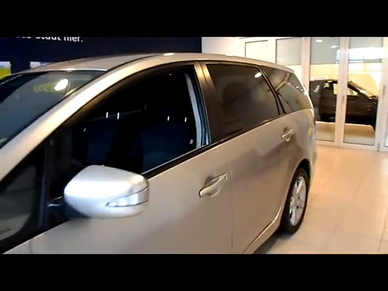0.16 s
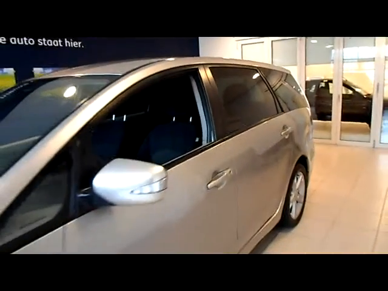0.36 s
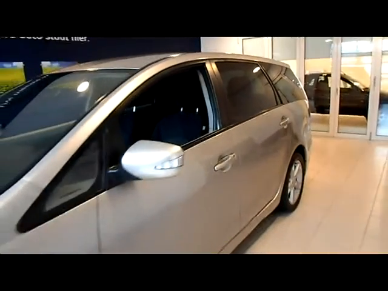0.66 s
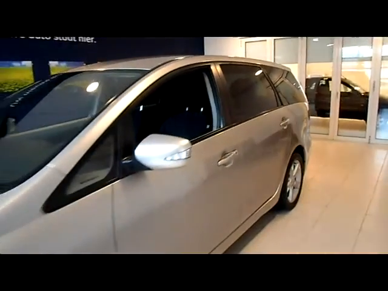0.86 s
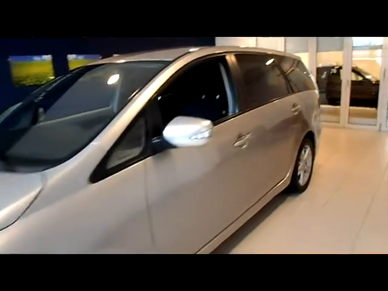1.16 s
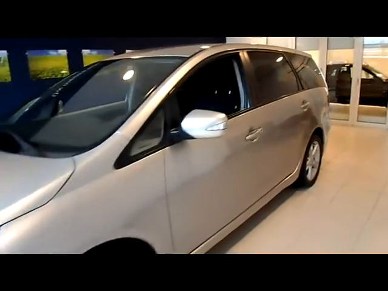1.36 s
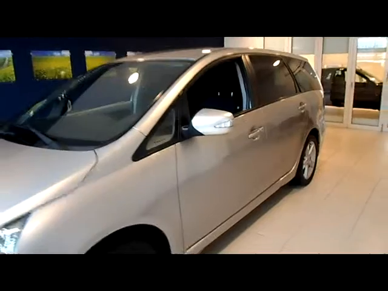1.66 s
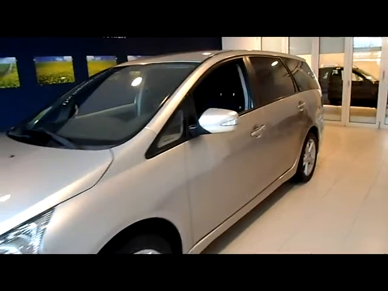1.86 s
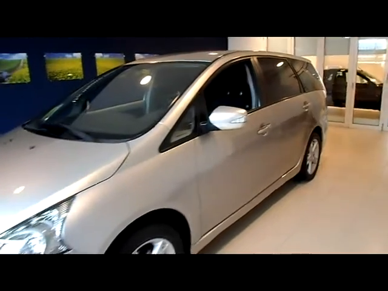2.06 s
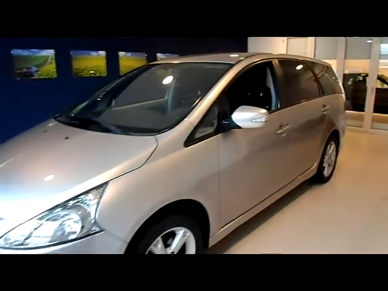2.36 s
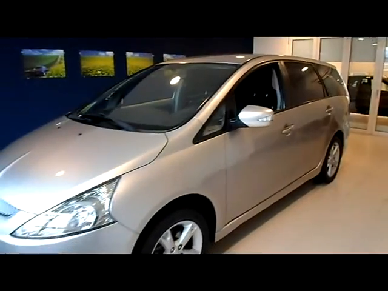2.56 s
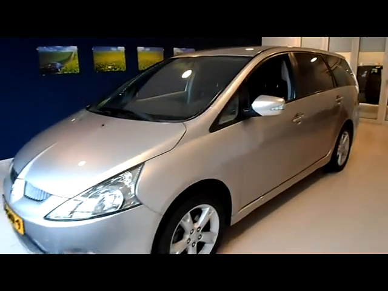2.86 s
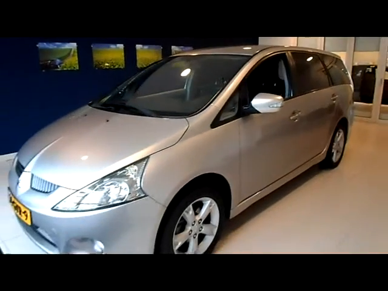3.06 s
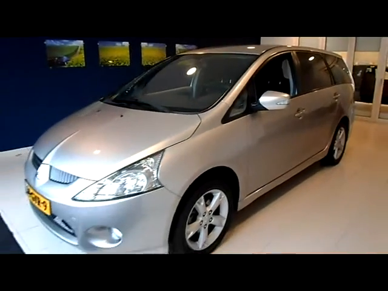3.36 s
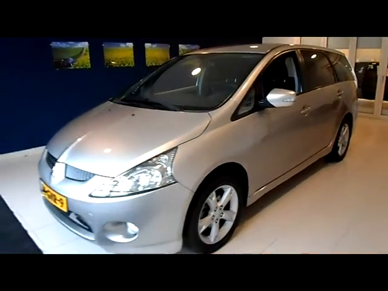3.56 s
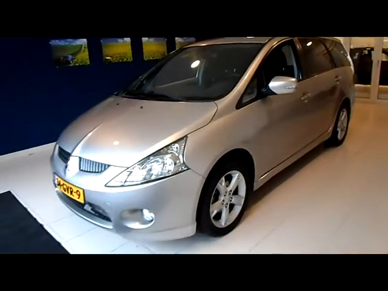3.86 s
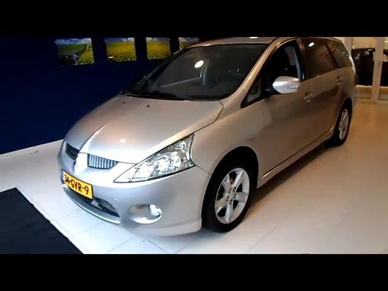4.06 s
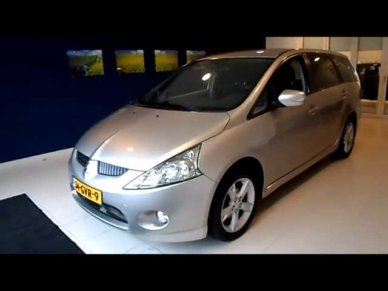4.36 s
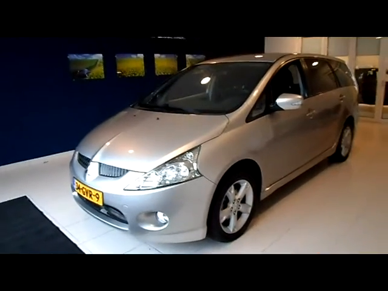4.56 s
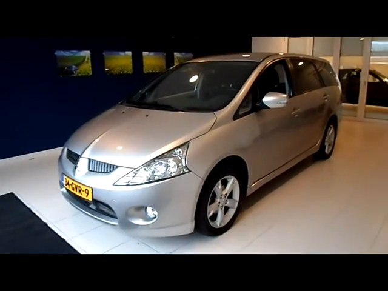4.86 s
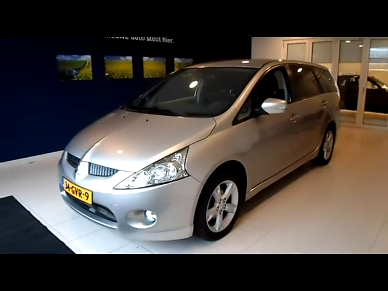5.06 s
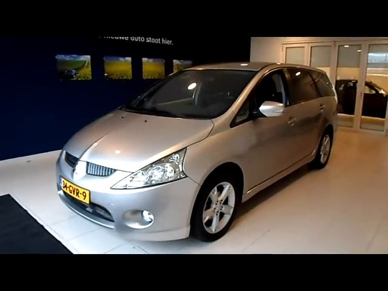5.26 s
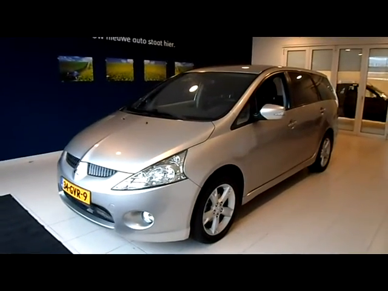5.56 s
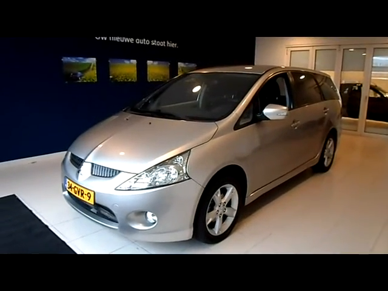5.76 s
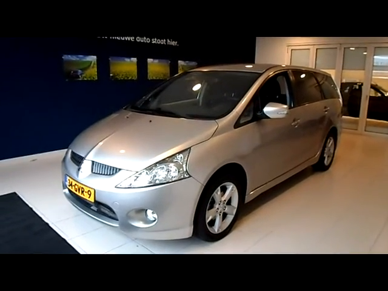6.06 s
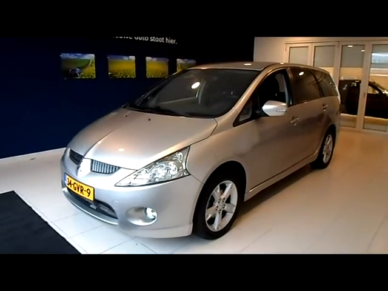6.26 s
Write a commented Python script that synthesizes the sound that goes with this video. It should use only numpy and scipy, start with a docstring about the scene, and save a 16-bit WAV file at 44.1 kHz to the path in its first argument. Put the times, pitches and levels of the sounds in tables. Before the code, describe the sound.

Faint ventilation-like noise with hollow resonances and barely audible motor tones fills the background. Very close and dry, the camera body carries handling noise: skin rubbing plastic, brief shell creaks, dry ticks and muffled grip knocks. The first three seconds are mostly calm; after a hard knock near five seconds, rumble swells, the palm judders across the casing, a small button snaps, and low thuds crowd the ending.

```python
"""Handling noise in a quiet car showroom

A fan-like hum, noise with hollow resonances and faint motor tones, fills the room and slowly sinks.
The hand carrying a small camera backwards rumbles through its body: low noise, growing toward the end.
Fingers rub (swelling noise) and creak (noise bursts in ringing modes) the plastic shell; the grip knocks
and the palm drags (low-passed blows and noise); dry ticks fall between, and a button clicks late on."""
import sys
import numpy as np
from scipy import signal
from scipy.fft import rfft, irfft
from scipy.io import wavfile

SR = 44100
rng = np.random.default_rng(int(sys.argv[2]) if len(sys.argv) > 2 else 0)


def store_pcm(level_fs):
    """Save levels as 16-bit WAV."""
    pcm = np.round(np.clip(level_fs, -1, 1) * 32767).astype(np.int16)
    wavfile.write(sys.argv[1], SR, np.atleast_2d(pcm).T)


N = 282592
TIME = np.arange(N) / SR  # s
FREQ = np.maximum(np.arange(N // 2 + 1) * SR / N, 1)  # Hz, kept above zero for the logarithm


def amp(db):
    """Level law: decibels to amplitude gain."""
    return 10 ** (np.asarray(db) / 20)


def unit(x):
    """Normalisation: scale to rms 1."""
    return x / np.sqrt(np.mean(x ** 2))


def contour(points):
    """Spectral envelope: join (Hz, dB) points on a log-frequency axis."""
    hz, db = np.transpose(points)
    return np.interp(np.log(FREQ), np.log(hz), db)


def noise(db):
    """Spectral shaping: Gaussian noise with the given density in dB per Hz."""
    spectrum = rfft(rng.standard_normal(N)) * amp(db)
    return irfft(spectrum, N) * np.sqrt(SR / 2)


def walk(rate):
    """Slow random modulation: low-passed noise of rms 1, wandering about rate times a second."""
    spectrum = rfft(rng.standard_normal(N)) * np.exp(-(FREQ / rate) ** 2)
    return unit(irfft(spectrum, N))


def fade(t, t60):
    """Exponential damping: a loss of 60 dB in t60."""
    return np.exp(-np.log(1000) * t / t60)


def swell(s, length):
    """Bell-shaped envelope around time s, length wide at half height."""
    return 2 ** -((2 * (TIME - s) / length) ** 2)


def resonate(x, hz, width):
    """Simple resonance: a band-pass with gain 1 at the centre."""
    return signal.lfilter(*signal.iirpeak(hz, hz / width, fs=SR), x)


def cushion(x, hz, q):
    """Mass on a soft spring: passes what lies under hz and falls 12 dB an octave above."""
    w = 2 * np.tan(np.pi * hz / SR)
    return signal.lfilter(*signal.bilinear([w * w], [1, w / q, w * w]), x)


def add(out, s, x):
    """Superposition: mix x into out from time s."""
    i = min(int(s * SR), N - 1)
    out[i:i + len(x)] += x[:N - i]


def hum(waver_db=0.42, drift_hz=0.83):
    """Resonant filtering: moving air coloured by fixed resonances, with slightly unsteady motor tones."""
    # Air noise between the resonances. Each row: frequency in Hz, density in dB per Hz before the slow fall.
    air_points = [(150, -80.5), (240, -84.5), (650, -87.3), (950, -88), (1090, -92.5), (1400, -96.5),
                  (2200, -96), (2850, -104), (3900, -105.5), (4550, -101.8), (6200, -109.5), (9700, -111.3),
                  (10800, -117), (12400, -113.8)]
    # Resonances of the hum. Each row: frequency in Hz, width in Hz at half the lift, lift in dB.
    hollows = [(303, 36, 9.5), (368, 40, 6.5), (545, 75, 8), (788, 90, 14.3), (1140, 36, 9), (1210, 90, 8),
               (1298, 72, 14.8), (1495, 65, 9.5), (1625, 130, 6.5), (1972, 160, 14.5), (2250, 130, 5),
               (3420, 230, 6), (4810, 170, 5.5), (5860, 120, 3), (7450, 500, 1.8)]
    # Faint motor tones. Each row: mean frequency in Hz, rms level in dB before the slow fall.
    motor_tones = [(154, -67), (571, -73), (832, -68), (1128, -77), (2089, -76.5), (2270, -79), (2330, -82)]
    start_db, fall_db_per_s = 0.8, 0.16  # the hum sinks a little as the camera backs away

    lift = sum(db * 2 ** -((2 * (FREQ - hz) / width) ** 2) for hz, width, db in hollows)
    sound = noise(contour(air_points) + lift) * amp(waver_db * walk(2.4))
    for hz, db in motor_tones:
        phase = 2 * np.pi * np.cumsum(hz + drift_hz * walk(2.76)) / SR
        sound = sound + amp(db) * np.sqrt(2) * np.sin(phase)
    return sound * amp(start_db - fall_db_per_s * TIME)


def rumble(sway_db=1, sway_rate=3):
    """Structure-borne sound: the moving hand shakes the microphone through the body, more at each lurch."""
    # Colour of the rumble. Each row: frequency in Hz, relative density in dB.
    colour = [(10, 0.5), (30, -0.5), (42, -1.5), (56, -8.5), (100, -15.5), (200, -31), (400, -52),
              (1000, -47), (4000, -87)]
    # Lurches of the arm. Each row: time of the peak in seconds, lift of the rumble in dB.
    lurch_rows = [(.52, 4.5), (.9, 3.5), (2.0, 6.5), (3.37, 1.5), (5.0, 5.5), (5.63, 6.5), (6.38, 6.5)]
    hand_db, lurch_s = -40.5, 0.14  # rms level of the steady carry; length of a lurch
    regrip_s, regrip_db_per_s = 4.77, 13  # from here the hand shifts its hold and the rumble keeps growing

    regrip = regrip_db_per_s * np.maximum(TIME - regrip_s, 0)
    lurches = sum(db * swell(s, lurch_s) for s, db in lurch_rows)
    level_db = hand_db + regrip + lurches + sway_db * walk(sway_rate)
    return unit(noise(contour(colour))) * amp(level_db)


def rubs(grain_db=2.0, grain_rate=350):
    """Sliding friction: skin passes over plastic in dense uneven slips that swell and fade with pressure."""
    # Colour of sliding skin. Each row: frequency in Hz, relative density in dB.
    skin = [(400, -38), (1300, -17.5), (1950, 11), (2500, -2), (3600, 0.5), (4400, -6.5), (5500, -18),
            (9000, -20.5), (16000, -29)]
    # Finger rubs. Each row: time of the peak in seconds, length in seconds, rms level at the peak in dB.
    strokes = [(0.062, 0.014, -41), (0.173, 0.067, -53.5), (3.026, 0.14, -58.5), (4.075, 0.087, -53.5),
               (4.685, 0.21, -62), (4.96, 0.076, -62.5)]
    slips = unit(noise(contour(skin)) * amp(grain_db * walk(grain_rate)))
    pressure = sum(amp(db) * swell(s, length) for s, length, db in strokes)
    return slips * pressure


def ticks(t60=0.0016, edge_hz=6000):
    """Heavily damped impulse: tiny jolts right at the microphone, too short to ring."""
    # Dry ticks. Each row: start in seconds, peak in dB before the edge is softened.
    jolts = [(3.8104, -19), (4.7938, -25.5), (5.1895, -32), (5.492, -30), (5.6817, -32.5), (5.932, -28.5),
             (6.277, -24)]
    out = np.zeros(N)
    jolt = cushion(fade(TIME[:SR // 50], t60), edge_hz, q=0.42)
    for s, db in jolts:
        add(out, s, -amp(db) * jolt)
    return out


def button(rise_s=0.00053):
    """Modal synthesis: a small sprung button is touched, then snaps, each time as damped sines."""
    # Modes of the button. Each row: frequency in Hz, 60 dB decay time in seconds, relative level in dB.
    modes = [(1560, 0.022, 2), (1790, 0.029, -8), (3330, .01, -13), (3700, 0.011, -14.5),
             (5480, 0.019, -24.5), (8200, 0.0031, -13), (12400, 0.014, -23.5)]
    # Clicks of the button. Each row: start in seconds, gain on all modes in dB.
    presses = [(6.061, -31), (6.146, -18.5)]
    out, t = np.zeros(N), TIME[:SR // 10]
    ring = sum(amp(db) * fade(t, t60) * np.sin(2 * np.pi * hz * t) for hz, t60, db in modes)
    for s, db in presses:
        add(out, s, amp(db) * ring * np.minimum(t / rise_s, 1))
    return out


def shell(x, low_hz, low_db, top_db):
    """Modal resonance: the plastic shell rings in fixed modes, the lowest and highest weighted per call."""
    # Upper modes. Each row: frequency in Hz, width in Hz of each of two passes, gain in dB before top_db.
    upper_modes = [(2620, 710, -30), (3440, 900, -5.5), (4230, 920, -15), (4700, 1200, -13),
                   (7600, 4600, -37), (13500, 5600, -32)]
    lowest_mode = (low_hz, 0.23 * low_hz, low_db)  # its width is a share of its pitch
    out = 0
    for k, (hz, width, db) in enumerate([lowest_mode] + list(upper_modes)):
        lift_db = top_db * (hz > 5000)
        ring = resonate(resonate(x, hz, width), hz, width)
        # neighbouring modes swing in opposite directions at the microphone
        out = out + (-1) ** k * amp(db + lift_db) * ring
    return out


def creaks(snap_db=17, burst_db=4, burst_t60=0.0046, rise_s=.001, size=176):
    """Stick-slip: a seam lets go with a snap, a quick burst and a dying run of tiny slips."""
    # Creaks of the shell. Each row: start in seconds, level in dB over the first size samples,
    # 60 dB decay time of the slips in seconds, gain of the lowest mode in dB.
    creak_rows = [(.042, -44.5, 0.042, 7), (0.0527, -52, .038, 4), (1.2399, -50.5, 0.0087, -10),
                  (1.522, -51, 0.007, -19), (1.876, -47, 0.014, -8), (3.1131, -41, 0.06, 3.5),
                  (3.3484, -37, 0.058, 6.5), (3.8274, -31.5, .038, 4.5), (3.9551, -42, .007, 6),
                  (4.862, -38.5, 0.13, 4.5), (5.3225, -40.5, .04, 10), (5.6135, -41.5, 0.064, 0),
                  (5.629, -36, 0.022, 14.5), (5.778, -44, 0.034, 10), (5.794, -44, 0.046, 16),
                  (6.309, -42.5, 0.055, 6.5), (6.363, -40, 0.081, -0.5), (6.373, -42, .015, 20),
                  (6.4, -32.5, .057, 4)]
    shell_hz = 1900  # lowest mode of the shell
    # creaks louder than firm_db lift the modes over 5 kHz, softer ones lower them
    firm_db, bright_db_per_db = -47, 0.4

    out, t = np.zeros(N), TIME[:SR // 5]
    snap = amp(snap_db) * signal.unit_impulse(len(t), int(rise_s * SR))
    for s, db, t60, low_db in creak_rows:
        force = fade(t, t60) + amp(burst_db) * fade(t, burst_t60)
        force = force * np.minimum(t / rise_s, 1)
        slips = rng.standard_normal(len(t)) * force
        top_db = bright_db_per_db * (db - firm_db)
        ring = shell(snap + slips, shell_hz, low_db, top_db)
        add(out, s, ring * amp(db) / np.std(ring[:size]))
    return out


def drags(q=0.92, skin_hz=600, skin_q=0.38):
    """Low-passed friction: the palm judders over the body, muffled by flesh: quick attack, hold, release."""
    # Drags of the palm. Each row: start in seconds, length in seconds, rms level while held in dB.
    strokes = [(5.599, 0.037, -21.5), (5.757, 0.074, -24), (6.356, 0.02, -27)]
    attack_s, release_t60, judder_hz = 0.0044, .22, 145  # rise (s), 60 dB release (s), corner of the judder

    flesh = cushion(rng.standard_normal(N), judder_hz, q)
    judder = unit(cushion(flesh, skin_hz, skin_q))
    pressure = np.zeros(N)
    for s, length, db in strokes:
        attack = np.clip((TIME - s) / attack_s, 0, 1)
        release = fade(np.maximum(TIME - s - length, 0), release_t60)
        pressure += amp(db) * attack * release
    return judder * pressure


def knocks(q=1.42, grain_db=2.0, grit_db=-50):
    """Impact on a compliant contact: a soft fingertip strikes, then scuffs; firmer contact sounds higher."""
    # Knocks of the grip. Each row: start in seconds, peak of the blow in dB, corner of the contact in Hz,
    # 60 dB decay time of the scuff in seconds.
    strikes = [(3.115, -34, 150, 0.042), (3.351, -25.5, 414, 0.08), (3.83, -16.5, 160, 0.092),
               (4.844, -19, 113, 0.1), (4.859, -8, 665, 0.06), (4.8609, -8, 97, 0.15),
               (4.877, -14.5, 607, 0.096), (5.354, -22, 120, 0.16), (5.6286, -20, 1380, .05),
               (5.763, -14, 113, 0.072), (5.794, -25.5, 1320, 0.051), (6.062, -21, 124, 0.051),
               (6.1458, -18, 433, .04), (6.308, -8.5, 74.6, 0.085), (6.362, -7, 87, 0.083),
               (6.4, -14, 153, .1)]
    scuff_db = -13.5  # rms of the scuff before its decay, relative to the peak of the blow

    out, t = np.zeros(N), TIME[:SR // 4]
    grain = amp(grain_db * walk(198))
    for s, db, hz, t60 in strikes:
        blow = cushion(signal.unit_impulse(len(t)), hz, q)
        grain_here = np.roll(grain, -int(s * SR))[:len(t)]
        slips = rng.standard_normal(len(t)) * grain_here
        settling = slips * fade(t, t60)
        scuff = cushion(settling, hz, q) / np.std(cushion(slips, hz, q))
        grit = amp(grit_db) * settling  # a trace of the scuff reaches the microphone unsoftened
        add(out, s, amp(db) * (blow / blow.max() + amp(scuff_db) * (scuff + grit)))
    return out


def scene():
    """Superposition: room hum plus the dry handling sounds that travel through the camera body."""
    background = hum() + rumble()
    handling = rubs() + ticks() + button() + creaks() + drags() + knocks()
    return (background + handling)[None]


def record(dry):
    """Soft saturation and band-limiting: large swings are rounded, the end fades and the top is cut."""
    top_hz = 15680
    held = dry / (1 + (dry / .6) ** 8) ** (1 / 8)  # swings stay within 0.6
    ending = np.minimum((TIME[-1] - TIME) / .004, 1)  # 4 ms fade
    low_pass = signal.ellip(12, .1, 70, top_hz, fs=SR, output="sos")
    return signal.sosfilt(low_pass, held * ending)


dry = scene()
out = record(dry)
store_pcm(out)
```